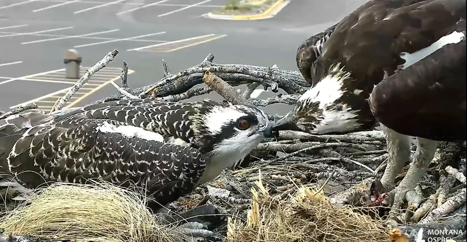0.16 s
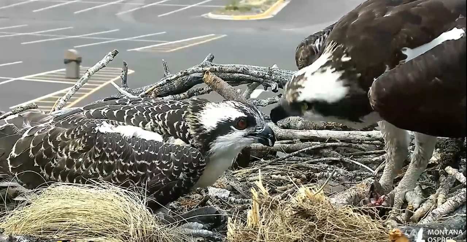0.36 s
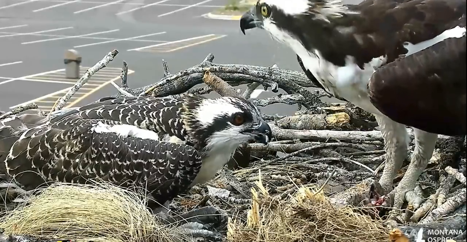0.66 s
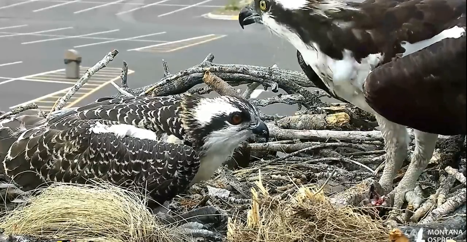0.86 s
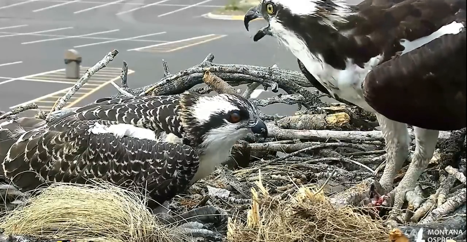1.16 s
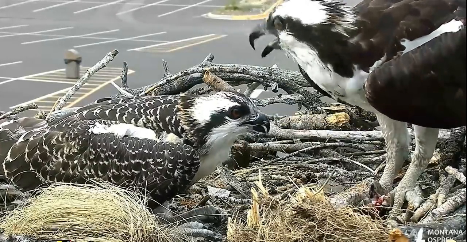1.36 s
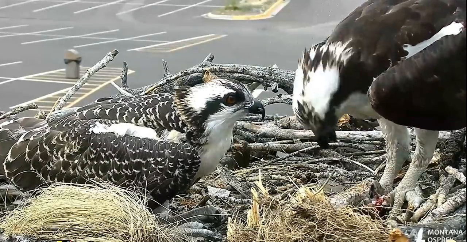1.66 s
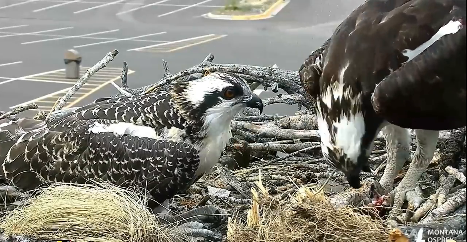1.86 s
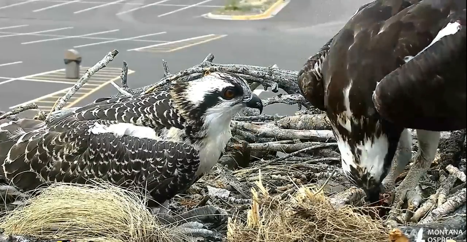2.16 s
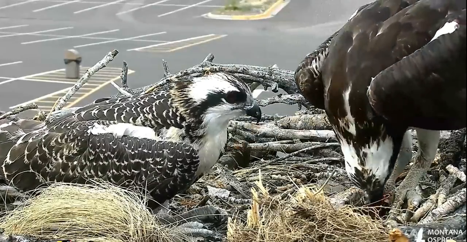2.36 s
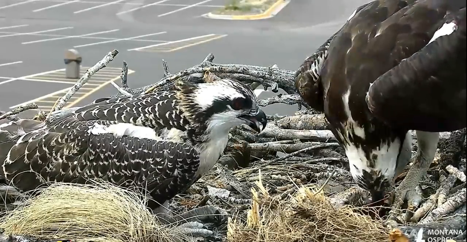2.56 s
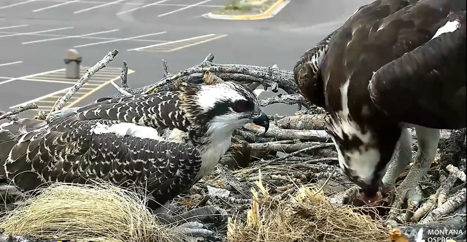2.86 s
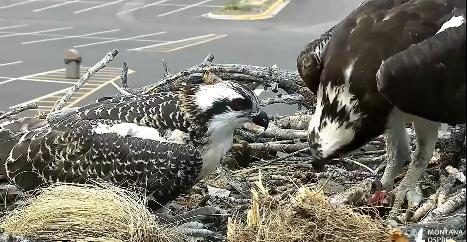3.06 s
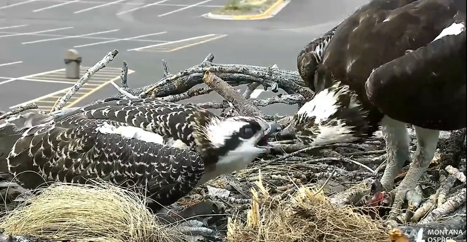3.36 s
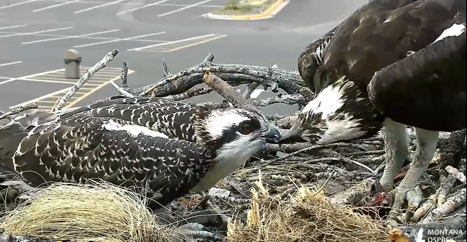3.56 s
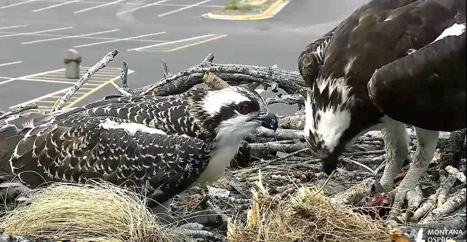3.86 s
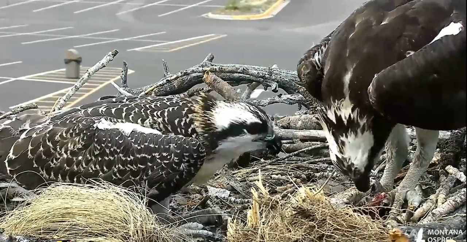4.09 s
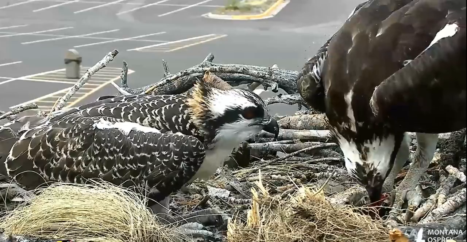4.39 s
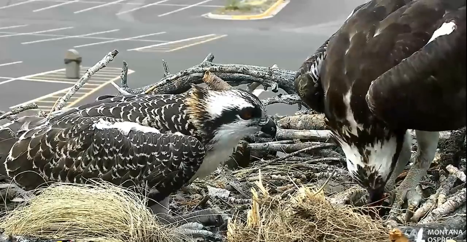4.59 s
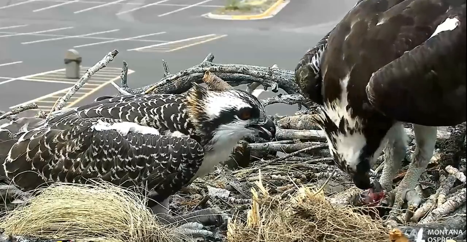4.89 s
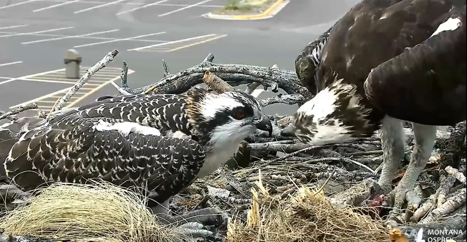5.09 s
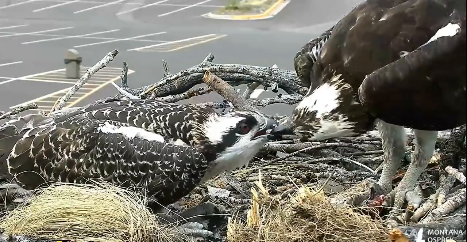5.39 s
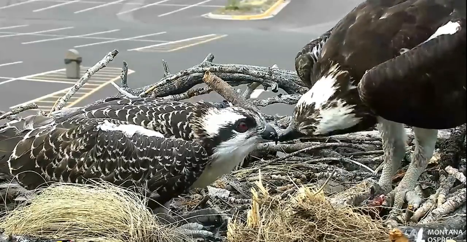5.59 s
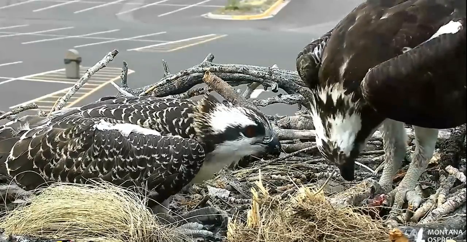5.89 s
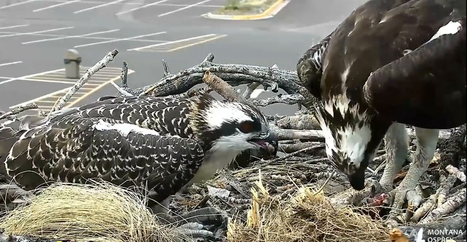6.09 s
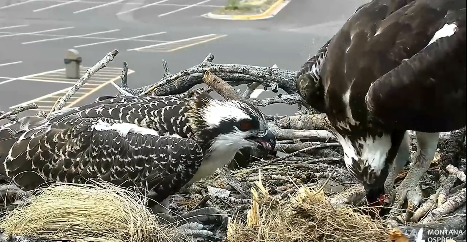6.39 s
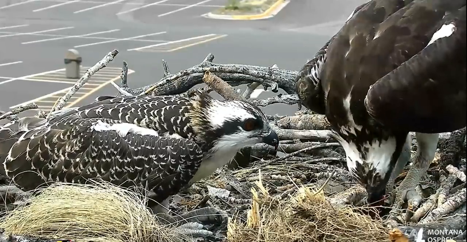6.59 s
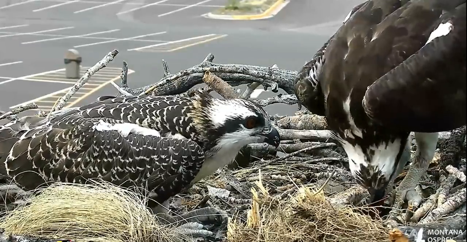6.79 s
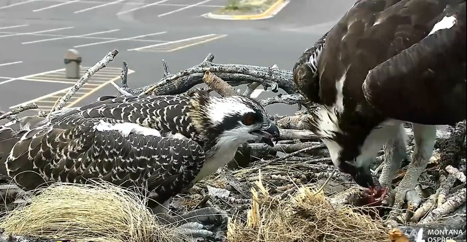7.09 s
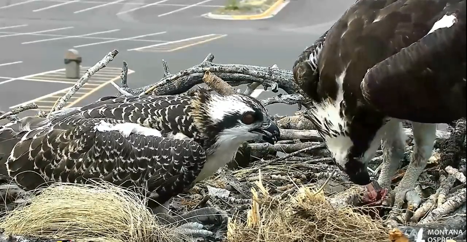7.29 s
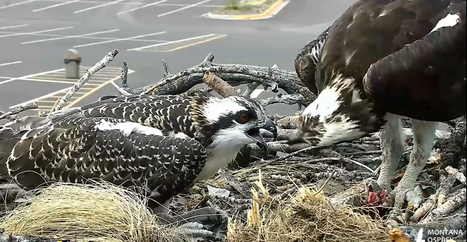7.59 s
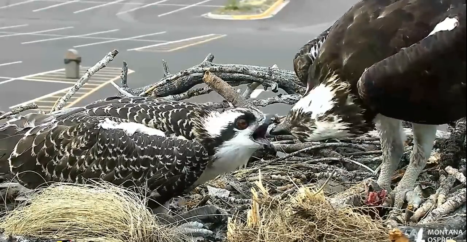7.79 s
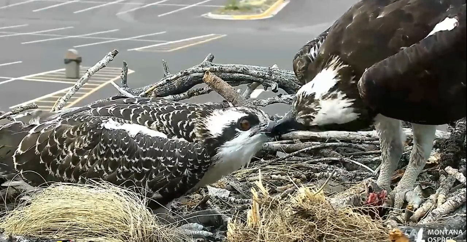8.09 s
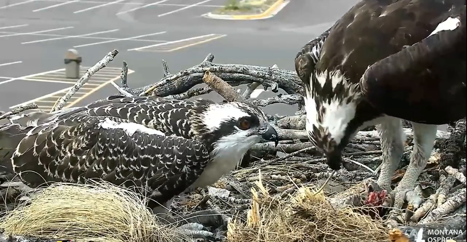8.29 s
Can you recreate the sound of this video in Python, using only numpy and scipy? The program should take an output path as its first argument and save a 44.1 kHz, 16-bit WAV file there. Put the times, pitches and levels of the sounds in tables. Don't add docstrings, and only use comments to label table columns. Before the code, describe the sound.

An osprey chick on a stick nest begs close to a small outdoor camera microphone. After a quiet start come five loud, clear, quick whistled chirps, then a weaker one. Isolated soft, raspy chirps follow at long gaps, and a final bout of hoarse, brighter chirps closes the scene. Very faint distant bird whistles and steady, low-level traffic hiss lie behind.

```python
import sys
import numpy as np
from scipy import signal
from scipy.fft import rfft, irfft, next_fast_len
from scipy.io import wavfile
from scipy.ndimage import uniform_filter1d, map_coordinates

SR = 44100
rng = np.random.default_rng(int(sys.argv[2]) if len(sys.argv) > 2 else 0)


def level_to_linear(level):
    exponent = np.asarray(level, float) / 20
    return 10 ** exponent


def waveform_to_disk(signal):
    frames = np.transpose(np.atleast_2d(signal))
    scaled = np.clip(frames, -1, 1) * 32767
    samples = np.round(scaled).astype(np.int16)
    wavfile.write(sys.argv[1], SR, samples)


N = 372644

# freq_hz, density_db
HISS_SPECTRUM = [(16, -7), (60, -6), (340, -6.5), (470, -16), (620, -19.5), (780, -14.5), (1100, -10.5),
                 (1400, -2), (1620, -1), (2000, -7), (2400, -3), (2760, 0), (3250, -7.5), (3650, -11.5),
                 (4200, -32), (5500, -63.5)]
# time_s, level_db
HISS_LEVEL = [
    (0.0, -67.5),
    (6.54, -68),
    (8.45, -67.5),
]
# start_s, end_s, first_hz, last_hz, peak_db
LEADS = [
    (.846, .879, 2170, 2780, -32.5),
    (1.031, 1.052, 2350, 2697, -25),
    (1.214, 1.241, 2346, 2763, -23),
    (3.684, 3.703, 2590, 2470, -51.5),
    (8.068, 8.084, 2340, 3290, -51),
]
# time_s, pitch_hz, level_db
HELD = [
    [(.878, 3260, -42), (.882, 3300, -38), (.895, 3240, -44), (.901, 3000, -48), (.908, 3460, -36),
     (.914, 3282, -31), (.92, 3163, -26), (.931, 3085, -28.4), (.944, 2860, -48)],
    [(1.05, 2950, -32.5), (1.053, 2931, -28.6), (1.068, 2800, -28.5), (1.084, 2690, -26),
     (1.093, 3055, -25.5), (1.103, 3143, -25.5), (1.112, 3028, -29.5), (1.117, 2920, -45.3)],
    [(1.24, 3320, -33.6), (1.243, 3318, -25.5), (1.251, 3277, -23.1), (1.291, 3248, -25),
     (1.299, 3200, -27.5), (1.308, 3020, -40.2)],
    [(1.416, 2530, -43), (1.42, 2594, -28.4), (1.43, 2752, -23.8), (1.45, 2880, -23.8),
     (1.474, 2974, -23.1), (1.495, 2969, -24.7), (1.512, 2885, -25), (1.522, 2790, -28.5),
     (1.537, 2360, -44.7)],
    [(1.635, 2800, -47.4), (1.638, 2851, -35.9), (1.646, 3034, -32.8), (1.674, 3160, -29.8),
     (1.715, 3052, -30.7), (1.75, 3111, -28.5), (1.778, 3123, -26.9), (1.785, 3170, -28.7),
     (1.79, 3310, -47.5)],
]
# time_s, pitch_hz, level_db
WANDERING = [
    [(1.788, 4340, -60), (1.825, 4430, -59), (1.842, 4240, -60), (1.85, 4160, -57), (1.86, 3660, -59)],
    [(2.022, 4030, -55), (2.041, 4250, -62), (2.075, 3910, -59), (2.101, 3877, -65), (2.14, 4330, -67.5),
     (2.165, 4660, -55.5), (2.193, 4980, -55.5), (2.216, 4800, -49.5), (2.224, 4610, -60)],
    [(3.226, 2863, -55), (3.245, 2950, -47.5), (3.27, 3260, -46), (3.296, 3240, -43), (3.314, 3100, -43.5),
     (3.33, 2460, -57)],
    [(5.228, 2450, -60), (5.237, 2835, -49), (5.255, 3025, -43), (5.268, 3100, -42), (5.272, 3050, -48),
     (5.292, 3165, -43.5), (5.3, 2980, -53), (5.322, 2820, -69)],
]
# octave_db, roughness_0_to_1, third_and_half_lines_db
VOICING = [
    (-38, .03, -12),
    (-35, .02, -12),
    (-37, .02, -7),
    (-27, .02, 3),
    (-39, .02, 6),
    (-30, .04, 0),
    (-40, .06, 0),
    (-29, .22, 0),
    (-27, .12, 0),
]
# start_s, end_s, first_hz, last_hz, peak_db
DIVES = [
    (.895, .915, 3690, 4000, -59),
    (1.822, 1.859, 4140, 3250, -49),
    (3.66, 3.683, 3880, 2600, -53.5),
]
# start_s, end_s, first_hz, last_hz, peak_db
EXITS = [
    (.94, .95, 2452, 2180, -45),
    (1.117, 1.129, 2600, 2205, -32),
    (1.308, 1.326, 2703, 2276, -28),
    (1.858, 1.878, 3055, 2400, -31),
    (2.019, 2.05, 3460, 3680, -38.5),
    (2.238, 2.254, 2725, 2280, -36),
    (7.948, 7.958, 2660, 2300, -48.5),
    (8.168, 8.182, 2890, 2400, -42.5),
    (3.391, 3.425, 2710, 3080, -47.5),
]
# start_s, end_s, first_hz, last_hz, level_db
FAR_WHISTLES = [
    (1.455, 1.51, 2220, 2250, -63),
    (2.607, 2.64, 2873, 3725, -74),
    (2.636, 2.662, 3695, 3000, -73.5),
    (5.333, 5.56, 2320, 2350, -75),
    (6.19, 6.278, 2580, 2420, -71.5),
    (6.28, 6.409, 2810, 2690, -71.5),
    (6.41, 6.572, 2548, 2268, -75),
    (6.852, 6.94, 2430, 2280, -75),
    (7.648, 7.685, 2580, 2500, -72),
    (8.18, 8.225, 2534, 2520, -69),
]
# start_s, end_s, first_hz, last_hz, peak_db
JUMPS = [
    (1.995, 2.02, 2540, 2814, -32),
    (3.622, 3.652, 2580, 2850, -52.5),
    (5.423, 5.433, 2550, 2760, -53),
    (7.232, 7.271, 2860, 3380, -42),
    (7.817, 7.838, 2570, 3160, -47),
    (8.324, 8.333, 2510, 2770, -52),
]
# start_s, end_s, throat_hz, level_db, upper_throat_db
RASPS = [(2.171, 2.25, 3630, -55.5, -19), (3.23, 3.334, 3240, -58.5, -11), (3.423, 3.518, 3200, -59.5, -12),
         (5.261, 5.316, 3240, -61, -12), (5.438, 5.55, 3300, -60.5, -17), (7.264, 7.291, 3140, -57, -30),
         (7.427, 7.518, 3200, -57.5, -26), (7.638, 7.745, 3300, -64, -3.5),
         (7.831, 7.948, 3230, -50, -11.5), (8.082, 8.181, 3300, -53.5, -20),
         (8.343, 8.423, 3120, -56.5, -20)]
# start_s, end_s, first_hz, last_hz, peak_db
LANDINGS = [
    (2.22, 2.239, 3960, 3300, -37.5),
    (3.495, 3.512, 3750, 3360, -49),
    (5.521, 5.546, 3600, 3310, -54.5),
    (7.931, 7.948, 3770, 3530, -46),
    (8.152, 8.168, 3735, 3410, -43.5),
]
# middle_s, pitch_hz, glide_hz_per_s, peak_db
PIPS = [
    (3.216, 1835, 22000, -59.5),
    (7.227, 1884, 13997, -63),
    (7.319, 1915, -33000, -69),
    (7.417, 1930, 24002, -65.5),
    (7.526, 1980, -42000, -67),
    (7.622, 1920, 30000, -59.5),
    (7.817, 1780, 33000, -65),
    (8.434, 1920, -36000, -68),
]
# start_s, end_s, first_hz, last_hz, peak_db
HOARSE = [
    (3.268, 3.32, 3740, 3820, -61.5),
    (3.414, 3.463, 3020, 3270, -60.5),
    (7.426, 7.502, 2970, 3750, -51),
    (7.629, 7.655, 2970, 3370, -46.5),
    (7.663, 7.717, 3420, 3420, -47.5),
    (7.892, 7.928, 5050, 4800, -57),
    (8.327, 8.348, 2700, 3250, -55),
]
# start_s, end_s, top_hz, last_hz, top_db
ARCHES = [
    (3.394, 3.5, 4440, 3700, -71),
    (5.421, 5.533, 4400, 3750, -72.5),
    (7.428, 7.503, 4150, 3800, -62),
    (7.626, 7.729, 4300, 3700, -59),
    (7.822, 7.936, 4400, 3800, -60.5),
    (8.076, 8.157, 4200, 3800, -67),
    (8.34, 8.412, 4110, 3500, -55),
]
# start_s, end_s, top_hz, last_hz, top_db
HUMPS = [
    (3.677, 3.727, 3640, 2680, -66.5),
    (5.267, 5.328, 3856, 3240, -54),
    (7.264, 7.293, 3770, 3650, -53.5),
]
# start_s, end_s, first_hz, last_hz, peak_db
SNAPS = [
    (5.33, 5.341, 2820, 2440, -44),
    (7.294, 7.313, 3230, 2720, -38),
    (7.505, 7.523, 3510, 2680, -40),
    (7.73, 7.742, 3320, 2900, -36.5),
    (8.4135, 8.428, 3240, 2790, -37),
]
# freq_hz, density_db
CIRCUIT_SPECTRUM = [(3000, -0.5), (6200, -2), (8500, -9), (11500, -11), (15000, -5.5)]

# peak_at_0_to_1, start_drop_db, end_drop_db, rise_power, fall_power, bend_power
LEAD = (.68, 23, 15, 1.9, 2.6, .75)
JUMP = (.5, 20, 15, 5, 4, .65)
EXIT = (.2, 10, 23, 1.5, 1.45, .75)
DIVE = (1.5, 10.4, 7.5, 3.9, 1.5, 1.8)
HOARSELY = (1.8, 2.3333, 10, 2.5, 2.5, .45)
SNAP = (.06, 2, 22, 1, 2.1, .8)
LEAD_OCTAVE_DB, EXIT_OCTAVE_DB, SNAP_OCTAVE_DB, HOARSE_OCTAVE_DB = -31.5, -23.5, -22.5, -19
CLEAR_ROUGH, LANDING_ROUGH, HOARSE_ROUGH = .02, .15, .5
NOTE_LEAD_S = .002
ARCH_TOP_AT, HUMP_TOP_AT = .68, .45


def unit(x):
    return x / np.sqrt(np.mean(np.abs(x) ** 2) + 1e-20)


def filtered(x, response):
    m = next_fast_len(len(x) + 8192)
    return irfft(rfft(x, m) * response(np.fft.rfftfreq(m, 1 / SR)), m)[:len(x)]


def wobble(count, rate_hz):
    knots = rng.standard_normal(int(count / SR * 2000) + 4)
    return map_coordinates(knots, [np.arange(count) * min(rate_hz, 1900) / SR])


def fade(count, seconds):
    t = np.arange(count) / SR
    edge = np.clip(np.minimum(t, t[::-1]) / seconds, 0, 1)
    return np.sin(np.pi / 2 * edge) ** 2


def add(track, start_s, sound):
    track[round(start_s * SR):][:len(sound)] += sound


def hiss():
    cells = signal.stft(rng.standard_normal(N), nperseg=512)[2]
    patches = uniform_filter1d(rng.standard_normal(cells.shape), size=8, axis=0)
    patches = uniform_filter1d(patches, size=20, axis=1)
    noise = signal.istft(cells * level_to_linear(0.79 * unit(patches)), nperseg=512)[1][:N]
    hz, density_db = np.transpose(HISS_SPECTRUM)
    colour = filtered(noise, lambda f: level_to_linear(np.interp(np.log(f + 1), np.log(hz), density_db)))
    s, level_db = np.transpose(HISS_LEVEL)
    return level_to_linear(np.interp(np.arange(N) / SR, s, level_db) + 5) * unit(colour)


def chick():
    track = np.zeros(N + SR)
    notes = [(rows, *voicing) for rows, voicing in zip(HELD + WANDERING, VOICING)]
    for table, shape, octave_db, rough in (
            (LEADS, LEAD, LEAD_OCTAVE_DB, CLEAR_ROUGH),
            (JUMPS, JUMP, LEAD_OCTAVE_DB, CLEAR_ROUGH),
            (EXITS, EXIT, EXIT_OCTAVE_DB, CLEAR_ROUGH),
            (SNAPS, SNAP, SNAP_OCTAVE_DB, CLEAR_ROUGH),
            (DIVES, DIVE, EXIT_OCTAVE_DB, CLEAR_ROUGH),
            (HOARSE, HOARSELY, HOARSE_OCTAVE_DB, HOARSE_ROUGH),
            (LANDINGS, JUMP, EXIT_OCTAVE_DB, LANDING_ROUGH)):
        notes += [glide(*row, shape, octave_db, rough) for row in table]
    notes += [arch(*row, ARCH_TOP_AT) for row in ARCHES]
    notes += [arch(*row, HUMP_TOP_AT) for row in HUMPS]
    notes += [pip(*row) for row in PIPS]
    for rows, *voicing in notes:
        add(track, rows[0][0] - NOTE_LEAD_S, whistle(rows, *voicing))
    for start_s, end_s, throat_hz, level_db, upper_db in RASPS:
        add(track, start_s, level_to_linear(level_db) * rasp(end_s - start_s, throat_hz, upper_db))
    return track[:N]


def glide(start_s, end_s, first_hz, last_hz, peak_db, shape, octave_db, rough):
    peak, start_drop_db, end_drop_db, rise, fall, bend = shape
    u = np.linspace(0, 1, num=24)
    rising_db = start_drop_db * np.abs(1 - u / peak) ** rise
    falling_db = end_drop_db * np.abs((u - peak) / (1 - peak)) ** fall
    level_db = peak_db - np.where(u < peak, rising_db, falling_db)
    hz = first_hz + (last_hz - first_hz) * u ** bend
    mean_khz_up = ((first_hz + last_hz) / 2 - 2424) / 1000
    return np.c_[start_s + (end_s - start_s) * u, hz, level_db], octave_db - 18.5 * mean_khz_up, rough


def whistle(rows, octave_db, rough, rich_db=0):
    s, hz, db = np.transpose(rows)
    n = round((s[-1] - s[0] + 0.0047) * SR)
    t = s[0] - NOTE_LEAD_S + np.arange(n) / SR
    pitch_hz = uniform_filter1d(np.interp(t, s, hz), size=200, mode="nearest") + 6 * wobble(n, 150)
    level_db = uniform_filter1d(np.interp(t, s, db), size=60, mode="nearest") + .2 * wobble(n, 250)
    level = level_to_linear(level_db)
    cycles = np.cumsum(pitch_hz) / SR

    stumble = (wobble(n, 420) + 1j * wobble(n, 420)) / np.sqrt(2)
    stumble = stumble * level_to_linear(4.6 * rough * wobble(n, 220))
    swing = np.exp(2j * np.pi * cycles) * unit(1 - rough + rough * stumble)
    effort = (level / level.max()) ** 0.1
    turn = swing / np.abs(swing) * effort
    octave = level_to_linear(octave_db) * turn
    third = level_to_linear(octave_db - 25.5 + rich_db) * turn ** 2
    half = np.exp(1j * np.pi * cycles) * level_to_linear(6 * wobble(n, 70)) * np.exp(1j * wobble(n, 350))
    halfway = level_to_linear(-54 + rich_db) * half * (1 + .5 * turn)
    breath = level_to_linear(-45 + rich_db / 2) * (wobble(n, 1800) + 1j * wobble(n, 1800))
    tone = swing * (1 + octave + third + halfway + breath)
    return np.sqrt(2) * level * fade(n, .003) * tone.real


def far_bird():
    track = np.zeros(N + SR)
    for start_s, end_s, first_hz, last_hz, level_db in FAR_WHISTLES:
        n = round((end_s - start_s) * SR)
        pitch_hz = np.linspace(first_hz, last_hz, n) + 30 * wobble(n, 50)
        phase = 2 * np.pi * np.cumsum(pitch_hz) / SR
        level = level_to_linear(level_db + 8 + 2.2 * wobble(n, 45)) * fade(n, 0.0069)
        add(track, start_s, level * (np.sin(phase) + 0.05 * np.sin(phase / 2)))
    return track[:N]


def resonance(f, centre_hz, width_hz):
    damping = 1j * f * width_hz
    return damping / (centre_hz ** 2 - f * f + damping)


def rasp(length_s, throat_hz, upper_db):
    n = round(length_s * SR)
    slaps = (rng.random(n) < 650 / SR) * level_to_linear(3.2 * rng.standard_normal(n))
    slaps = slaps + 0.09 * rng.standard_normal(n)
    gape = np.sin(np.pi * np.linspace(0, 1, n) ** 1.2) ** 2
    throat = unit(filtered(slaps, lambda f: resonance(f, throat_hz, 1.2 * 830) ** 3))
    upper = unit(filtered(slaps, lambda f: resonance(f, 5100, 1500) ** 6))
    return throat * fade(n, .009) + level_to_linear(upper_db) * gape * upper


def twig():
    track = np.zeros(N)
    decay = level_to_linear(-60 * np.arange(88) / SR / .002)
    add(track, 2.896, level_to_linear(-55) * rng.standard_normal(88) * decay)
    return filtered(track, lambda f: 1 / (1 + (3000 / (f + 1)) ** 4) / (1 + (f / 7000) ** 4))


def pip(middle_s, pitch_hz, glide_hz_per_s, peak_db):
    offset_s = 0.009 * np.array([-.5, 0, .5])
    level_db = peak_db - np.array([6, 0, 6])
    return np.c_[middle_s + offset_s, pitch_hz + glide_hz_per_s * offset_s, level_db], 6.5, .05


def arch(start_s, end_s, top_hz, last_hz, top_db, top_at):
    foot_hz, leap = 3200, .55
    u = np.linspace(0, 1, num=40)
    before = np.clip(1 - u / top_at, 0, 1)
    after = np.clip((u - top_at) / (1 - top_at), 0, 1)
    climb = leap * before ** 8 + (1 - leap) * before ** 1.8
    hz = top_hz - (top_hz - foot_hz) * climb - (top_hz - last_hz) * after ** 2.6

    def near_throat(f):
        return np.exp(-((f - 3500) / 480) ** 2)

    throat_db = 12.5 + 6.5 * (2 * u - 1)
    level_db = top_db + throat_db * (near_throat(hz) - near_throat(top_hz))
    return np.c_[start_s + (end_s - start_s) * u, hz, level_db], -29, .33


def scene():
    voice = chick()
    t = np.arange(SR // 3) / SR
    decay = level_to_linear(-60 * t / .06) + 0.16 * level_to_linear(-60 * t / 0.4)
    scatter = rng.standard_normal(len(t)) * decay
    nest = signal.fftconvolve(voice, scatter / np.linalg.norm(scatter))[:N]
    return (voice + level_to_linear(-24.5) * nest + far_bird() + twig() + hiss())[None]


def clock_mirror(x):
    clock_hz = 16000
    folded = 2 * x * np.cos(2 * np.pi * clock_hz * np.arange(N) / SR)
    return filtered(folded, lambda f: (f > clock_hz / 2) * np.clip(clock_hz / (f + 1) - 1, 0, .32) ** 1.3)


def circuit_noise():
    hz, density_db = np.transpose(CIRCUIT_SPECTRUM)
    noise = filtered(rng.standard_normal(N), lambda f: level_to_linear(np.interp(f, hz, density_db)))
    return level_to_linear(-78.5) * unit(noise)


def band_limit(x):
    return signal.sosfilt(signal.butter(12, 15660, fs=SR, output="sos"), x)


def record(dry):
    mixed = dry[0] + level_to_linear(-2.7) * clock_mirror(dry[0]) + circuit_noise()
    mix = filtered(mixed, lambda f: f < 15330)[None]
    return band_limit(mix)


dry = scene()
out = record(dry)
waveform_to_disk(out)
```